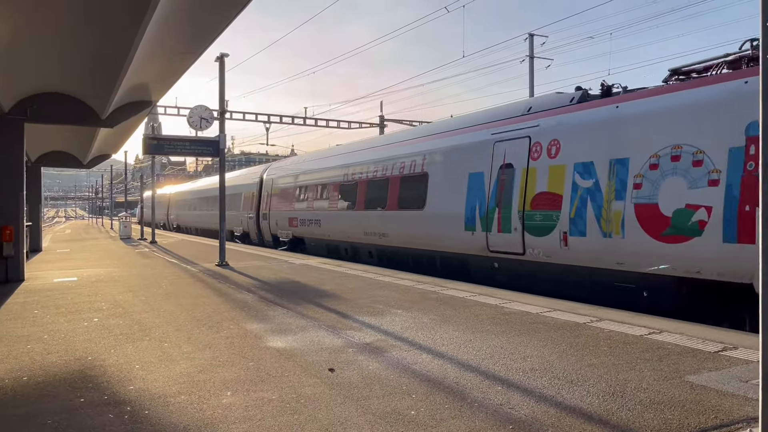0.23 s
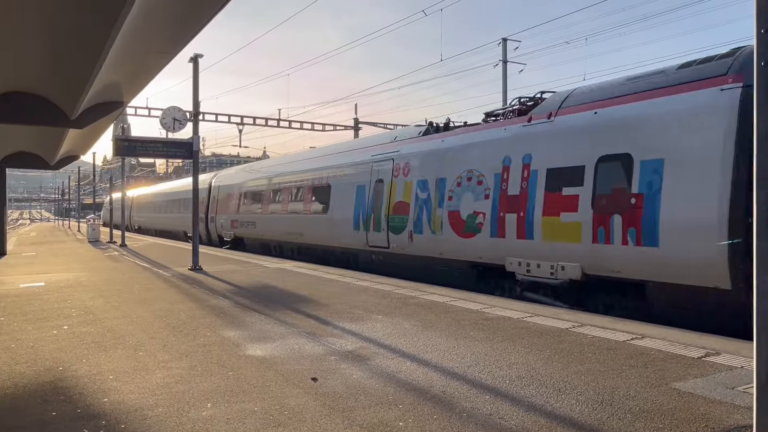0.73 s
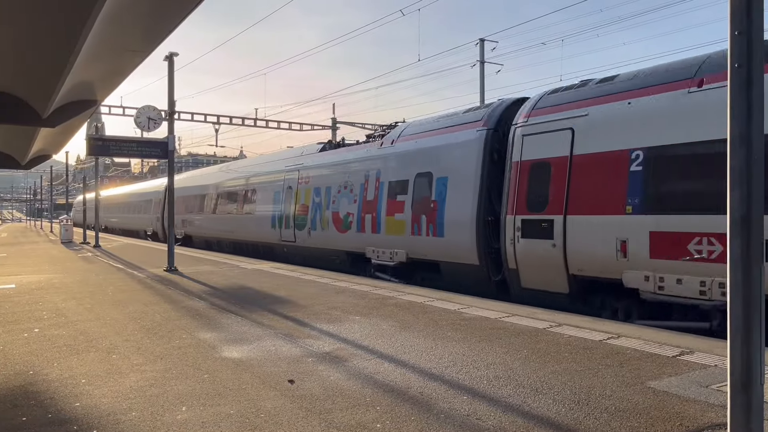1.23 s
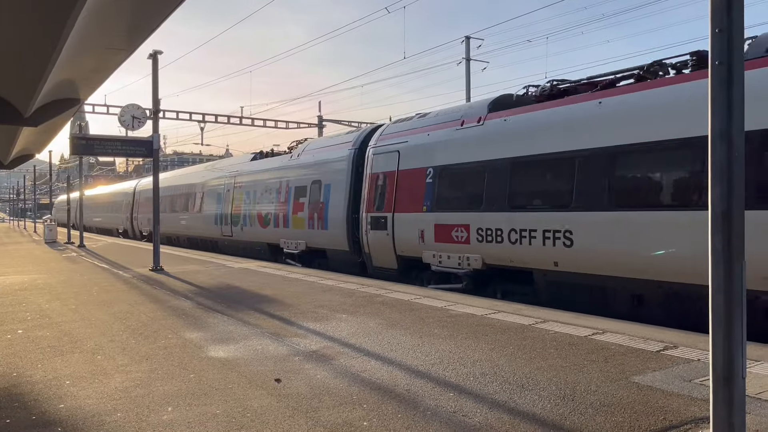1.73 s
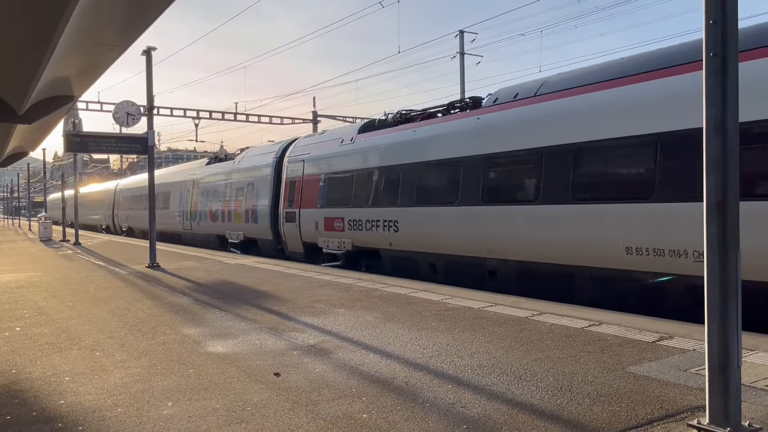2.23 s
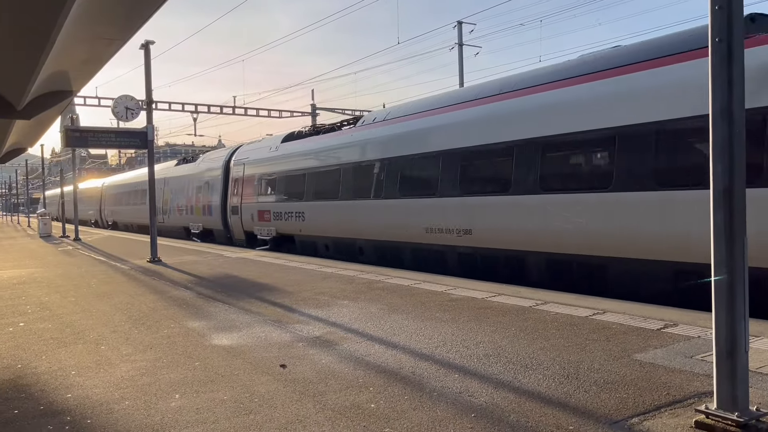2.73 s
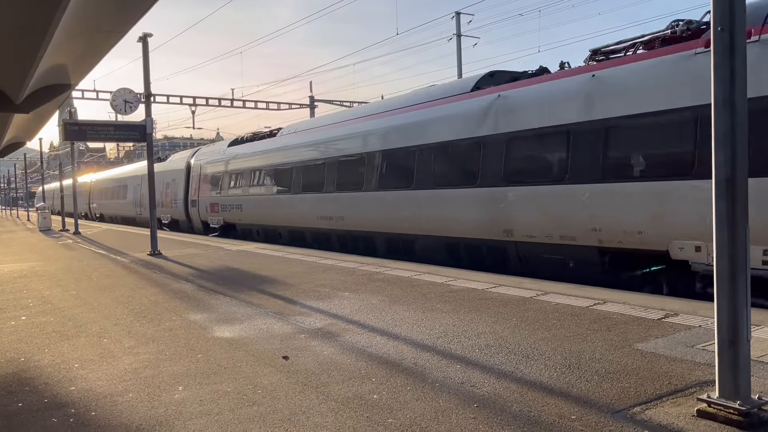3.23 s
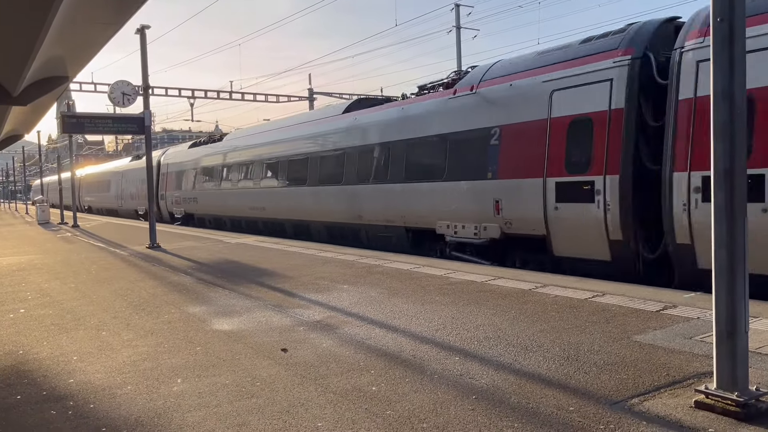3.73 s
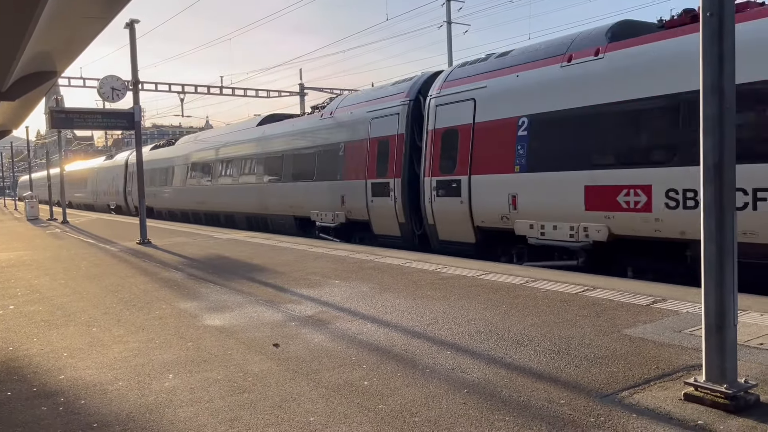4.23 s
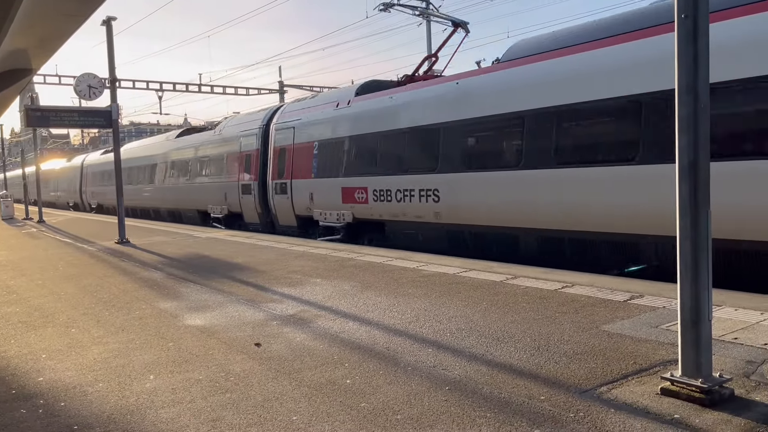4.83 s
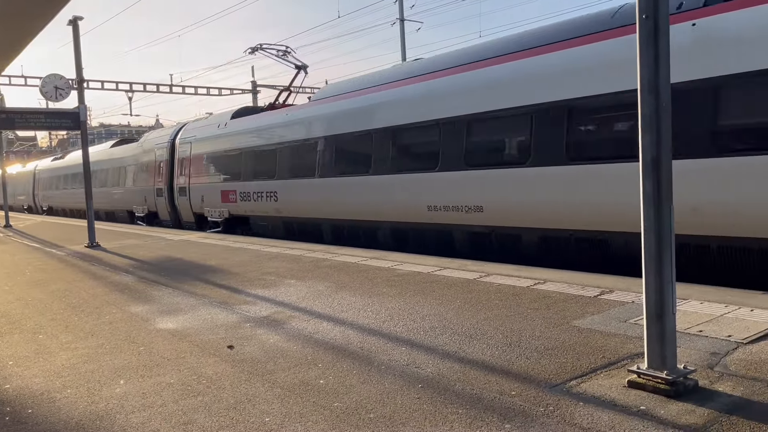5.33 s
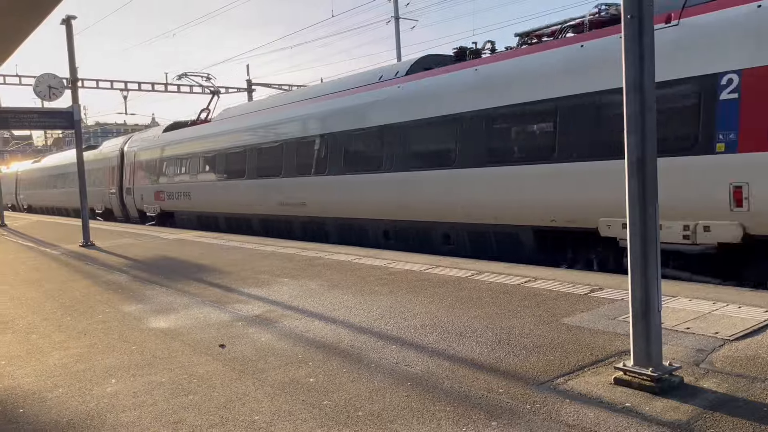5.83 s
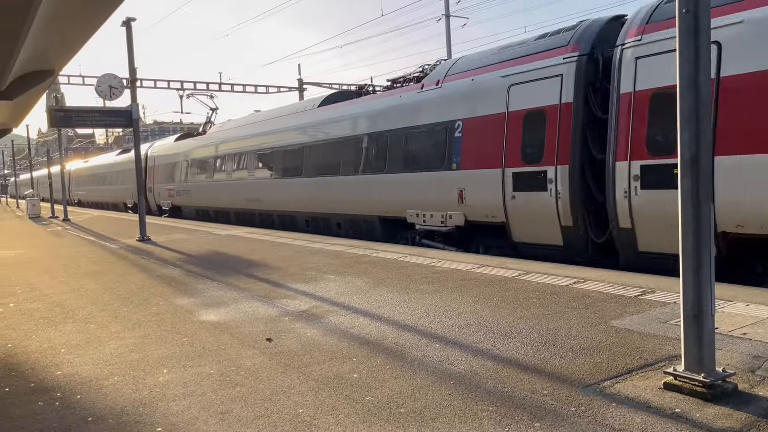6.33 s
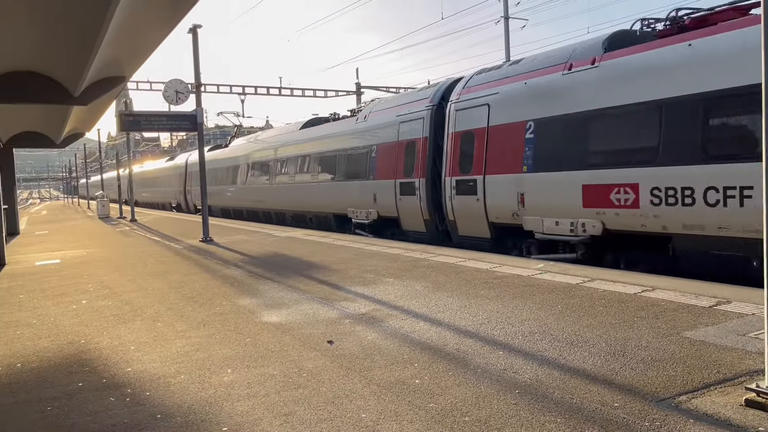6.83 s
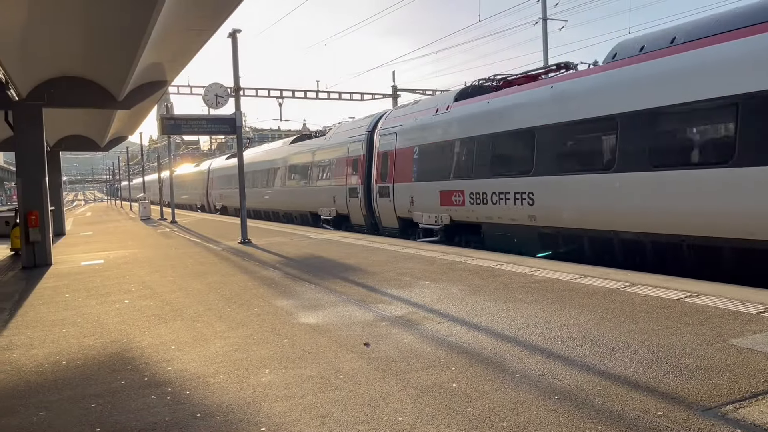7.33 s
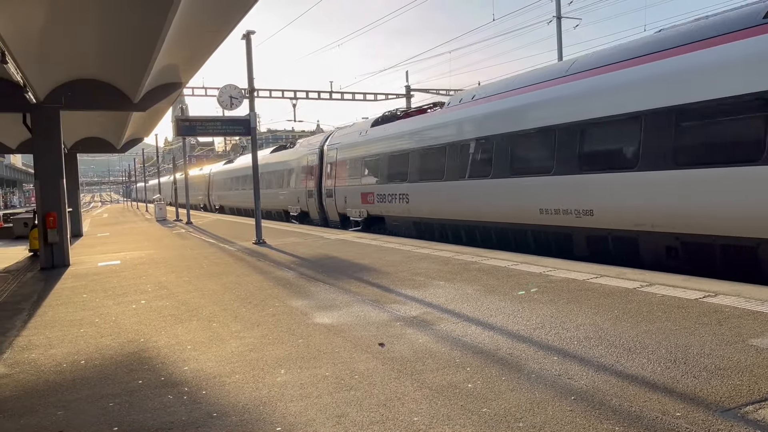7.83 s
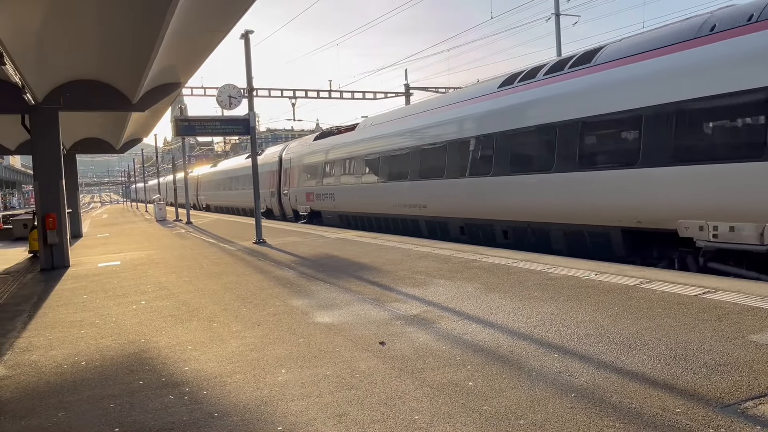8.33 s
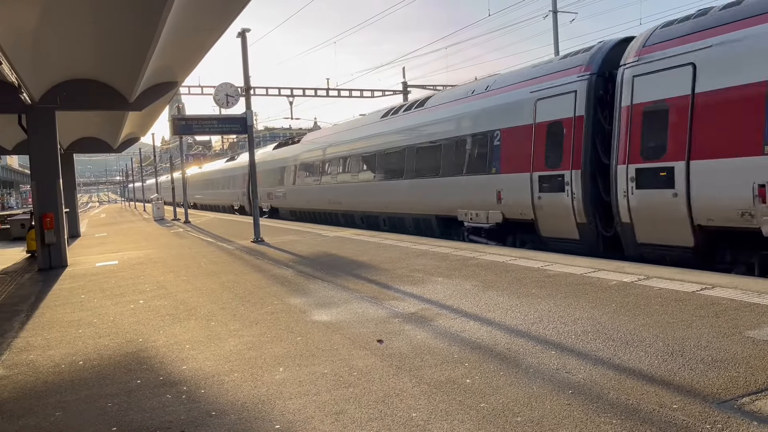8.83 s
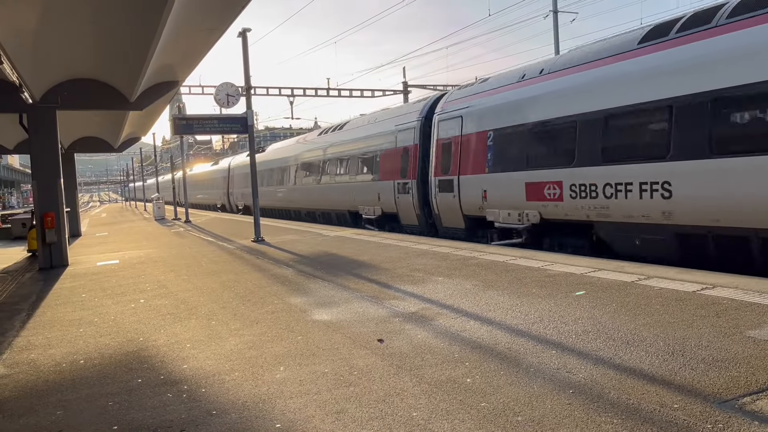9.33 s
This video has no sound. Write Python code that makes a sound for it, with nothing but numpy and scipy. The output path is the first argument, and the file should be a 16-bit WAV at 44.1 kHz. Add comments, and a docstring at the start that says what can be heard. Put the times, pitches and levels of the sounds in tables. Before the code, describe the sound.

An electric train accelerates past a platform, its motor whine climbing steadily over low wheel rumble, growing louder with ringing tones and a firm rail drone.

```python
"""An electric train pulls out along a roofed platform, heard close by in stereo.
From the start, gear and motor whines climb with its speed, each a tone blurred as by several drives;
wheels and rails rumble, roar and hiss as shaped noise, and the rail drones in a blurred tone.
Held tones sing early, faintly, and strongly later; short gliding tones squeal and the drone firms up;
late, a flange rubs the rail in a fine high hiss."""
import sys
import numpy as np
from scipy import signal
from scipy.fft import rfft, irfft, next_fast_len
from scipy.io import wavfile

SR = 44100
rng = np.random.default_rng(int(sys.argv[2]) if len(sys.argv) > 2 else 0)


def log_audio(samples):
    """Write samples as a 16-bit WAV file to the path given in sys.argv[1]."""
    # one column per channel
    frames = np.atleast_2d(samples).T
    # limit to full scale, then quantise
    limited = np.clip(frames, -1, 1)
    pcm = np.round(limited * 32767).astype(np.int16)
    wavfile.write(sys.argv[1], SR, pcm)


N = 423360

# Speed as gear-mesh pitch. Each row: time in seconds, pitch in Hz.
MESH_PITCH = [(0, 856), (.7, 886.5), (2, 967.3), (4, 1078), (6, 1166), (6.8, 1194), (8, 1259), (9.6, 1318)]
# Whines of the drives. Each row: multiple of the mesh pitch, blur in Hz.
WHINE_ORDERS = [(1.0, 36), (1.44, 32), (1.583, 48), (1.86, 70), (2.06, 85), (2.97, 110), (3.41, 130),
                (4.03, 100), (1.99, 30)]
# One value a whine: height of its steady core over its blur.
WHINE_CORES = [.5, .35, .35, .1, .15, .21, .09, .11, .4]
# Main gear whine as the drives come and go, before case modes. Each row: time in seconds, level in dB.
MAIN_WHINE_LEVEL = [(0, -41), (.6, -38.5), (1.2, -43.5), (1.8, -53), (3, -43.5), (3.9, -49), (4.3, -44),
                    (4.9, -45), (5.7, -39), (6.3, -34.5), (6.8, -28.5), (7.3, -27.5), (7.8, -30),
                    (8.2, -31), (8.7, -29.5), (9.1, -30), (9.6, -29.5)]
# Upper whines as a driven car draws near, before case modes.
# Each row: far level in dB, near level in dB, halfway time in seconds, rise in seconds.
UPPER_WHINE_ARRIVALS = [(-55.5, -48, 4.7, 0.47), (-59, -44, 5.9, 1.1), (-65, -48, 7, .5),
                        (-60, -47, 5.3, 0.54), (-67.5, -43.5, 5.5, 1.2), (-70, -49, 5.2, 0.47),
                        (-59.5, -56.5, 2.7, 0.99), (-58.5, -73, 2.9, 0.33)]
# Swells and dips, one list an upper whine. Each row: centre in seconds, half length in seconds, change in dB.
UPPER_WHINE_SWELLS = [
    [(0.3, 0.45, 1), (3.2, 0.71, -12), (5.5, 0.37, 5)],
    [(3.6, 0.52, 5), (5.4, .45, 4), (8.05, 0.16, 8), (8.5, 0.41, 10.5), (9.3, 0.26, 4.5)],
    [(4.1, 0.53, 7), (5.0, 0.71, 5.5)],
    [(4.05, 0.4, -18), (8.1, 0.31, -10.5), (9.0, 0.37, -14)],
    [(2.95, .3, 11), (4.2, .2, 6), (6.59, 0.032, 7.5), (6.8, 0.043, 4.5), (7.64, 0.022, 7.5),
     (7.98, 0.039, 1), (8.66, 0.048, 4), (9.1, 0.24, 5), (9.41, 0.05, 3)],
    [(3.0, 0.4, 8), (5.9, .5, -3), (6.4, 0.34, -0.5), (6.9, 0.093, 4.5), (7.6, .4, -3)],
    [(0.05, 0.18, 5.5), (2.2, 0.78, -7), (3.6, .6, 0), (5.2, 0.5, -1), (7.5, .25, -13), (8.7, 0.29, -17),
     (9.6, .2, -12)],
    [(0.1, .25, 9.5), (1.0, 0.29, 5), (2.4, 0.12, 2)],
]
# Fixed modes of wheels and gear cases. Each row: frequency in Hz, width in Hz, lift in dB.
CASE_MODES = [(1150, 14, 5), (1190, 14, 4), (1235, 11, 4), (1293, 11, 4), (1350, 16, 6), (1400, 20, 10),
              (1938, 18, 8), (2040, 22, 8), (2330, 30, 3), (2590, 40, 6), (3550, 60, 4), (4100, 60, 5),
              (4230, 60, 2)]
WHINE_WAVER_DB, WHINE_WAVERS_PER_S = 1.7, 9


def drives():
    """Whines locked to the speed, lifted where they cross a resonance of wheel or gear case."""
    mesh_hz, = in_time(MESH_PITCH)
    levels_db = in_time(MAIN_WHINE_LEVEL)
    for (far_db, near_db, halfway_s, rise_s), swells in zip(UPPER_WHINE_ARRIVALS, UPPER_WHINE_SWELLS):
        arrival_db = far_db + (near_db - far_db) * rise(halfway_s, rise_s)
        levels_db.append(arrival_db + bumps(swells))
    whines = np.zeros((2, N))
    for (multiple, blur_hz), level_db, core in zip(WHINE_ORDERS, levels_db, WHINE_CORES):
        waver_db = WHINE_WAVER_DB * drift(WHINE_WAVERS_PER_S)
        whines += from_db(level_db + waver_db) * blurred_tone(multiple * mesh_hz, blur_hz, core)
    size = next_fast_len(N + SR // 2)   # room for the modes to ring out
    gain = np.interp(np.arange(size // 2 + 1) * SR / size, bins_hz(), lift(CASE_MODES))
    return irfft(rfft(whines, size) * gain, size)[:, :N]


# Held tones. Each row: pitch in Hz, blur in Hz, height of steady core over blur.
HELD_TONES = [(1160, 14, 2.0), (1188, 11, 2.5), (1235, 10, 1.2), (1292, 9, 2.2), (2312, 26, .9),
              (2010, 34, 1.2)]
# One list a held tone. Each row: time in seconds, level in dB.
HELD_TONE_LEVELS = [
    [(5.1, -60), (5.4, -46), (5.55, -41), (5.75, -39), (5.9, -42), (6.04, -42), (6.2, -60)],
    [(6.1, -50), (6.25, -38), (6.33, -40), (6.36, -25), (6.39, -26), (6.42, -32), (6.45, -27), (6.5, -32),
     (6.6, -26), (6.67, -21), (6.72, -25), (6.77, -22), (6.85, -25), (6.89, -39), (6.95, -31), (7.2, -34),
     (7.3, -32), (7.5, -55)],
    [(7.0, -53), (7.26, -32), (7.36, -31), (7.48, -35), (7.74, -30.5), (7.84, -44), (8.0, -27), (8.15, -34),
     (8.25, -39), (8.4, -55)],
    [(7.85, -55), (8.05, -30), (8.23, -37), (8.31, -26), (8.38, -35), (8.5, -31), (8.62, -38), (8.68, -28),
     (8.85, -28), (8.89, -40), (8.96, -32), (9.07, -37), (9.15, -31), (9.29, -29), (9.32, -35), (9.36, -23),
     (9.44, -27), (9.5, -21), (9.55, -36), (9.6, -38)],
    [(0.4, -70), (0.54, -52), (0.7, -63), (0.85, -55), (0.97, -47), (1.1, -56), (1.2, -54), (1.4, -57),
     (1.6, -55), (1.85, -54), (2.05, -58), (2.3, -55), (2.6, -66)],
    [(2.0, -66), (2.3, -52), (2.5, -50), (3.1, -50), (3.5, -53), (3.9, -58), (4.3, -53), (4.7, -66)],
]


def held_tones():
    """Held tones that swell and sink, each blurred about a fixed pitch."""
    out = np.zeros((2, N))
    for (hz, blur_hz, core), rows in zip(HELD_TONES, HELD_TONE_LEVELS):
        first, last = round(rows[0][0] * SR), min(round(rows[-1][0] * SR), N)
        gain = from_db(in_time(rows)[0][first:last])
        out[:, first:last] += gain * blurred_tone(np.full(last - first, hz), blur_hz, core)
    return out


# Rail drone. Each row: time in seconds, pitch in Hz, blur in Hz, height of its steady core over the blur.
DRONE_PITCH = [(0, 258.7, 20, 0.3), (5, 265, 22, 0.3), (6.7, 252, 14, 0.5), (7.0, 250, 12, 2.1),
               (7.5, 259.4, 12, 2.3), (8.05, 259.5, 12, 2.1), (8.45, 267, 12, 2.1), (9.0, 265.5, 12, 1.8),
               (9.6, 282, 12, 2.1)]
# Each row: time in seconds, level in dB of the drone without its overtones.
DRONE_LEVEL = [(0, -43), (.4, -30), (1.0, -35), (2.2, -33), (2.45, -41), (2.75, -30), (3.3, -31),
               (4.0, -33), (5.2, -31), (5.9, -28.5), (6.7, -31), (6.92, -28), (6.98, -19), (7.06, -31),
               (7.33, -32), (7.37, -23), (7.41, -27), (7.47, -16), (7.58, -20), (7.64, -29), (7.7, -16),
               (7.81, -29), (7.86, -21), (8.02, -19), (8.1, -24), (8.31, -27), (8.37, -20), (8.41, -23),
               (8.46, -18), (8.52, -26), (8.6, -22), (8.78, -22), (9.0, -31), (9.1, -22), (9.15, -27),
               (9.2, -21), (9.25, -29), (9.32, -20), (9.41, -21), (9.46, -34), (9.51, -21), (9.6, -19)]
# Each row: multiple of the drone pitch, level in dB relative to the drone once that is strong.
DRONE_OVERTONES = [(2, -18), (3, -25), (4, -23)]
DRONE_STRONG_DB = -23.5
DRONE_WAVER_DB, DRONE_WAVERS_PER_S = .7, 5.5


def drone():
    """The rail drones in a blurred tone that firms up; driven hard it grows overtones."""
    level_db = in_time(DRONE_LEVEL)[0] + DRONE_WAVER_DB * drift(DRONE_WAVERS_PER_S)
    hz, blur_hz, core = in_time(DRONE_PITCH)
    out = blurred_tone(hz, blur_hz, core)
    strength_db = np.minimum(level_db - DRONE_STRONG_DB, 0)   # a weak drone loses its overtones faster
    for multiple, relative_db in DRONE_OVERTONES:
        out += from_db(relative_db + strength_db) * blurred_tone(multiple * hz, multiple * blur_hz)
    return from_db(level_db) * out


# Short gliding tones: high squeals, a mid song and a low drone overtone.
# Each row: start in seconds, end in seconds, first pitch in Hz, last pitch in Hz, blur in Hz, level in dB.
SHORT_GLIDES = [(5.3, 6.6, 3490, 3550, 70, -54), (7.0, 7.5, 7400, 7300, 60.5, -73),
                (7.15, 7.85, 515, 522, 16, -35.5), (8.72, 9.3, 4200, 5180, 50, -61),
                (8.42, 9.0, 8400, 8200, 50, -61), (9.1, 9.7, 8150, 8050, 60, -63.5),
                (8.6, 9.0, 6850, 6780, 70, -65), (9.2, 9.33, 6300, 6330, 110, -56),
                (9.4, 9.7, 6400, 6280, 90, -57.5)]
GRAB_DB, GRABS_PER_S = 3, 25


def short_glides():
    """Short gliding tones, high squeals among them, that swell and fade with an uneven level."""
    out = np.zeros((2, N))
    for start_s, end_s, first_hz, last_hz, blur_hz, level_db in SHORT_GLIDES:
        first, last = round(start_s * SR), min(round(end_s * SR), N)
        swell = np.hanning(last - first) ** 0.17
        grabs = from_db(level_db + GRAB_DB * drift(GRABS_PER_S)[first:last])
        glide_hz = np.linspace(first_hz, last_hz, last - first)
        out[:, first:last] += swell * grabs * blurred_tone(glide_hz, blur_hz)
    return out


# Each row: time in seconds, level in dB.
RUB_LEVEL = [(7.6, -74), (8.0, -71), (8.2, -63), (8.45, -60.5), (8.6, -55), (8.9, -56), (9.05, -60),
             (9.25, -67), (9.4, -61), (9.6, -62)]
# Brief spits in the rub. Each row: centre in seconds, half length in seconds, lift in dB.
RUB_SPITS = [(8.25, .03, 2), (8.56, .04, 3), (8.71, .02, 3.5), (8.81, .03, 3), (8.92, .02, 2)]
RUB_HZ, RUB_SPREAD_HZ = 10800, 1400
RUB_GRAIN_DB, RUB_GRAINS_PER_S = 1.0, 40


def rub():
    """A flange rubs the rail: a high, grainy hiss that swells and spits."""
    first = round(RUB_LEVEL[0][0] * SR)
    level_db = in_time(RUB_LEVEL)[0] + bumps(RUB_SPITS) + RUB_GRAIN_DB * drift(RUB_GRAINS_PER_S)
    out = np.zeros((2, N))
    out[:, first:] = from_db(level_db[first:]) * blurred_tone(np.full(N - first, RUB_HZ), RUB_SPREAD_HZ)
    return out


# Four lists, one value each for roar, wheel noise, hiss and air.
# Base level in dB at the starting speed.
START_DB = [-32, -40.5, -52.5, -62.5]
# Growth in dB per doubling of speed.
DB_PER_SPEED_DOUBLING = [9.74, 7.65, 7, 9.6]
# Lift in dB by a passing pair of bogies of strength 1.
BOGIE_LIFT_DB = [0.37, 0.6, 1.1, 3.2]
# Change in dB as the driven car draws near.
NEAR_CAR_DB = [-1.5, 0.8, 4, 0.5]
# Car ends with their bogies pass. Each row: centre in seconds, half length in seconds, strength.
BOGIE_PASSES = [(.7, 0.29, 0.93), (3.75, 0.22, 0.84), (6.35, 0.59, 0.7), (9.1, 1, 1.2)]
NEAR_CAR_S, NEAR_CAR_RISE_S = 5.3, 0.72


def rolling_levels():
    """Each noise grows with speed and changes with the driven car and passing bogies."""
    mesh_hz, = in_time(MESH_PITCH)
    speed_doublings = np.log2(mesh_hz / mesh_hz[0])
    causes = [speed_doublings, bumps(BOGIE_PASSES), rise(NEAR_CAR_S, NEAR_CAR_RISE_S)]
    effects_db = np.transpose([DB_PER_SPEED_DOUBLING, BOGIE_LIFT_DB, NEAR_CAR_DB])
    return np.array(START_DB)[:, None] + effects_db @ causes


# Colours of the five noises, before wheel modes. Each row: frequency in Hz, relative level in dB.
RUMBLE_COLOUR = [(15, -41.5), (25, -25), (33, -12), (45, -14), (65, 0.5), (100, -1.5), (200, -2),
                 (260, -1.5), (330, -18)]
ROAR_COLOUR = [(200, -5), (280, 0), (365, 1), (450, -4), (560, -8), (700, -13), (850, -30)]
WHEEL_COLOUR = [(550, -13), (750, 1), (1000, 0), (1550, -3), (1800, -10), (2700, -13), (3100, -20),
                (3600, -37.5)]
HISS_COLOUR = [(2600, -4.5), (3200, 0), (4000, 1), (5000, -4), (6000, -10), (6800, -40)]
AIR_COLOUR = [(5200, -25.5), (6200, -0.5), (8000, -2), (11000, -9), (13000, -13), (15500, -32.5),
              (18000, -42.5)]
# Low rumble. Each row: time in seconds, level in dB.
RUMBLE_LEVEL = [(0, -29), (0.83, -26), (1.09, -30), (2.3, -28.5), (3.66, -27), (4.52, -29.5), (6.65, -26),
                (7.7, -27), (8.5, -27), (9.6, -30.5)]
# The roar surges unevenly. Each row: centre in seconds, half length in seconds, lift in dB.
ROAR_SURGES = [(1.7, 0.18, 1), (3.5, 0.14, 1), (4.2, 0.38, 0.5), (6.0, 0.22, 2), (6.7, 0.35, 1.5),
               (8.2, .3, 2), (9.3, 0.34, -1)]


def rolling():
    """Wheel and rail roughness: five bands of noise from rumble to air."""
    roar_db, wheel_db, hiss_db, air_db = rolling_levels()
    out = from_db(in_time(RUMBLE_LEVEL)[0]) * noise(RUMBLE_COLOUR, flicker_db=0.76, flickers_per_s=14)
    out += from_db(roar_db + bumps(ROAR_SURGES)) * noise(ROAR_COLOUR, flicker_db=1.6, flickers_per_s=12)
    out += from_db(wheel_db) * noise(WHEEL_COLOUR, flicker_db=.5, flickers_per_s=15)
    out += from_db(hiss_db) * noise(HISS_COLOUR, flicker_db=.6, flickers_per_s=12)
    out += from_db(air_db) * noise(AIR_COLOUR, flicker_db=0.3, flickers_per_s=11)
    return out


# Ringing of wheels under the rolling noise. Each row: frequency in Hz, width in Hz, lift in dB.
WHEEL_MODES = [(95, 12, 3.5), (1614, 60, -2.5), (1970, 70, 1.5), (2315, 45, 4), (2927, 58, 2.5),
               (3480, 130, 1.5), (5090, 190, 3)]


def noise(colour, flicker_db, flickers_per_s):
    """Two unrelated noises of one colour, flickering together."""
    hz, level_db = np.transpose(colour)
    shape_db = np.interp(np.log(bins_hz()), np.log(hz), level_db, left=-90, right=-90)
    shape = from_db(shape_db) * lift(WHEEL_MODES)
    pair = irfft(rfft(rng.standard_normal((2, N))) * shape, N)
    return rms_one(pair * from_db(flicker_db * drift(flickers_per_s)))


def blurred_tone(hz, blur_hz, core=0):
    """A tone spread over hz +- blur, as from many near-equal sources coming and going; two draws."""
    steps = np.cumsum(np.broadcast_to(blur_hz, len(hz))) / SR * 8   # 8 points per blur period
    white = rng.standard_normal((4, int(steps[-1]) + 90))
    lowpass = signal.butter(2, .25, output="sos")   # corner at blur_hz
    slow = signal.sosfilt(lowpass, white)[:, 40:]   # filter onset dropped
    a, b, c, d = [np.interp(steps, np.arange(len(row)), row) for row in slow]
    phase = 2 * np.pi * np.cumsum(hz) / SR
    in_phase = np.array([a + core, c])
    quadrature = np.array([b, d - 0.71 * core])   # second draw: weaker core, a quarter turn off
    tone = in_phase * np.cos(phase) + quadrature * np.sin(phase)
    return rms_one(tone / np.sqrt(.5 + core ** 2))


def from_db(db):
    """Decibels to gain."""
    return 10 ** (np.asarray(db) / 20)


def rms_one(x):
    """Scale to unit power."""
    return x / np.sqrt(np.mean(np.abs(x) ** 2) + 1e-20)


def in_time(rows):
    """Columns of a curve table, one value a sample."""
    s, *columns = np.transpose(rows)
    return [np.interp(np.arange(N) / SR, s, c) for c in columns]


def bins_hz():
    """Frequencies of the spectrum bins, kept above zero for logarithms."""
    return np.arange(N // 2 + 1) * SR / N + 1e-3


def lift(modes):
    """Gain over frequency of a few resonances standing on a flat response."""
    gain_db, at_hz = 0, bins_hz()
    for hz, width_hz, lift_db in modes:
        gain_db = gain_db + lift_db / (1 + (2 * (at_hz - hz) / width_hz) ** 2)
    return from_db(gain_db)


def drift(points_per_s):
    """Slow chance: random points of spread 1 joined by lines."""
    points = rng.standard_normal(1000)
    return np.interp(np.arange(N) / SR * points_per_s, np.arange(1000), points)


def rise(halfway_s, rise_s):
    """A smooth step from 0 to 1."""
    return .5 + .5 * np.tanh((np.arange(N) / SR - halfway_s) / rise_s)


def bumps(rows):
    """Sum of bell-shaped swells or dips."""
    t = np.arange(N) / SR
    return sum(height * np.exp(-((t - centre_s) / half_s) ** 2) for centre_s, half_s, height in rows)


# Stereo image by frequency: likeness of the channels, phase and balance.
# Each row: frequency in Hz, likeness 0-1, right-channel phase in radians, left over right in dB.
STEREO_IMAGE = [(25, 0.99, 0, 0.6), (70, 0.985, 0.04, 0.9), (140, 0.94, 0.12, 1.2), (260, 0.87, 0.3, 1.6),
                (450, 0.66, 0.61, 1.6), (600, 0.23, 1.38, 1.0), (750, 0.25, 3.61, -1.2),
                (1100, 0.49, 2.4, -2.2), (1600, 0.48, 2.86, -2.2), (1750, 0.52, 5.75, 4.8),
                (2200, 0.68, 5.92, 1.7), (4000, 0.33, 4.9, 3.1), (4900, 0.3, 5.95, 5.6),
                (5300, 0.12, 8.42, 5.8), (6500, 0.4, 7.6, 1.7), (7400, 0.71, 8.6, 0.7),
                (7700, 1.0, 9.39, 0.0), (8850, 1.0, 9.42, 0.0), (10300, 0.6, 11.38, -0.3),
                (11200, 1.0, 12.53, 0.0), (12950, 1.0, 12.57, 0.0), (13700, 0.3, 14.56, 0.1),
                (14600, 1.0, 15.71, 0.0)]


def scene():
    """All sources in a stereo image whose channels are partly alike, partly unrelated."""
    first, second = rfft(drives() + held_tones() + drone() + short_glides() + rub() + rolling())
    hz, *columns = np.transpose(STEREO_IMAGE)
    alike, phase, tilt_db = [np.interp(bins_hz(), hz, c) for c in columns]
    alike = np.clip(alike, 0, 1)
    right = alike * np.exp(1j * phase) * first + np.sqrt(1 - alike ** 2) * second
    return irfft([first * from_db(tilt_db / 2), right * from_db(-tilt_db / 2)], N)


STOPBAND_EDGE_HZ, STOPBAND_DB = 15800, 70


def record(dry):
    """A steep low-pass cuts the top."""
    lowpass = signal.cheby2(12, STOPBAND_DB, STOPBAND_EDGE_HZ, fs=SR, output="sos")
    return signal.sosfilt(lowpass, dry)


dry = scene()
out = record(dry)
log_audio(out)
```